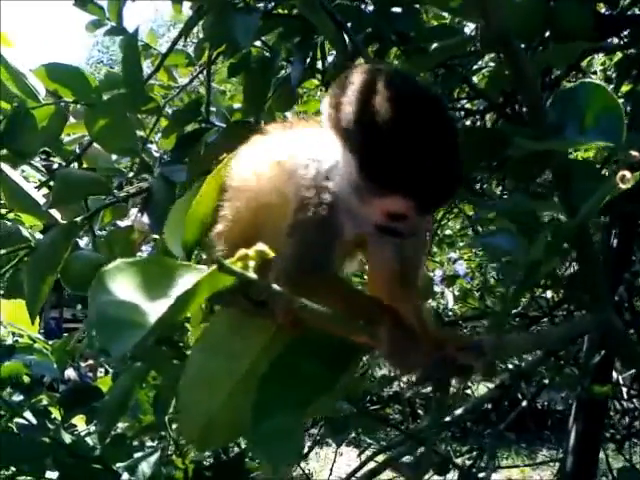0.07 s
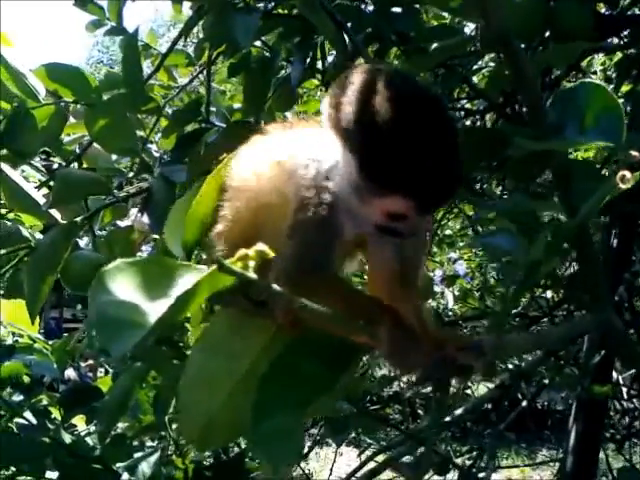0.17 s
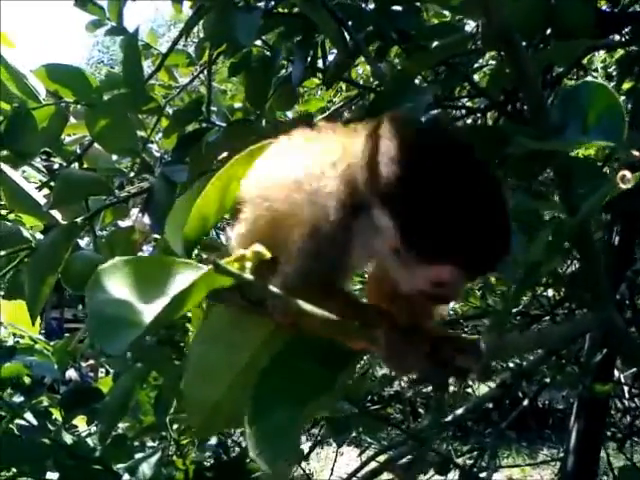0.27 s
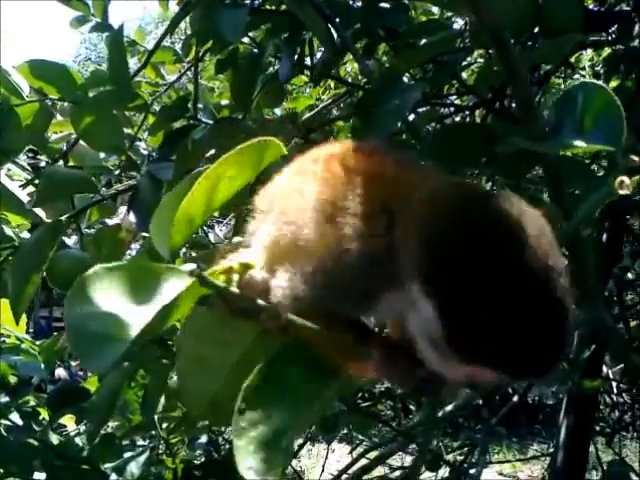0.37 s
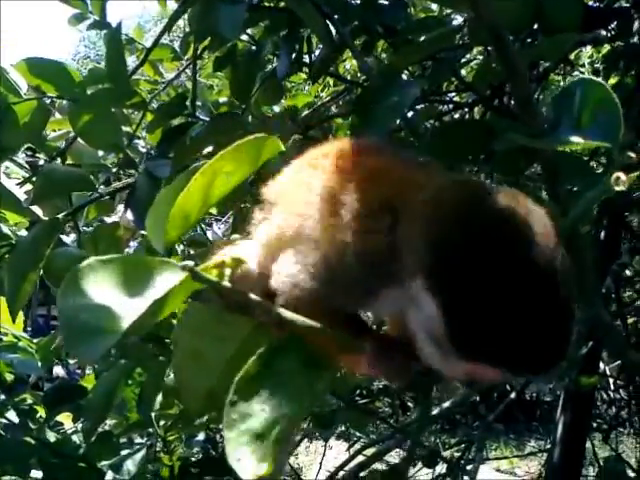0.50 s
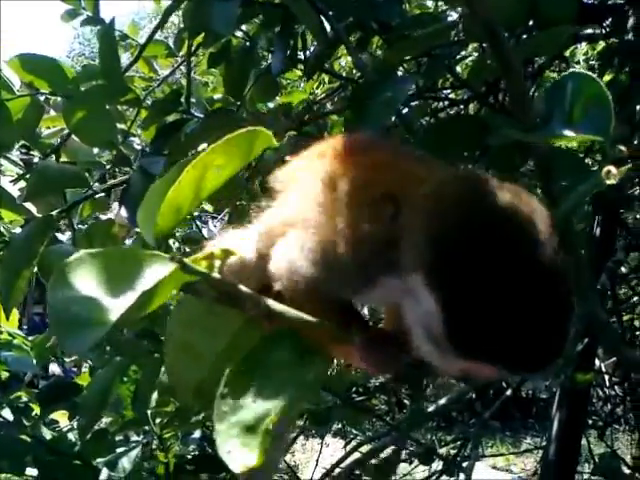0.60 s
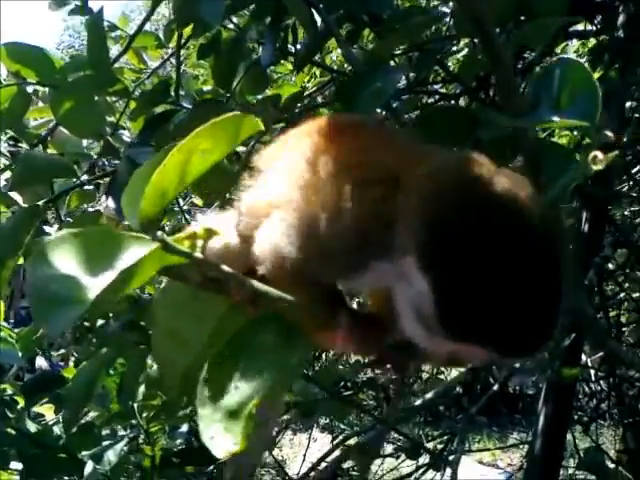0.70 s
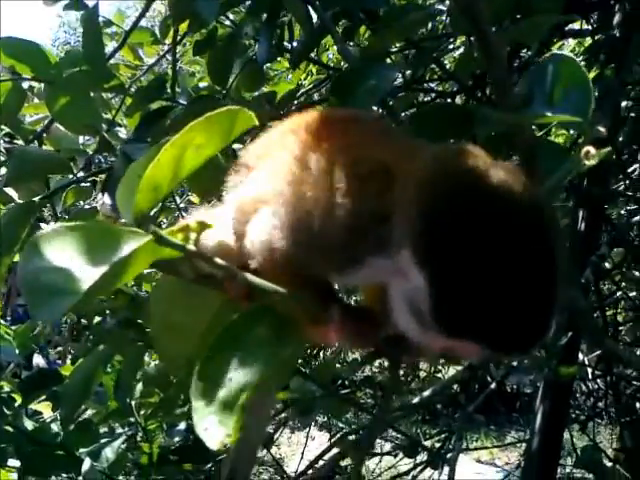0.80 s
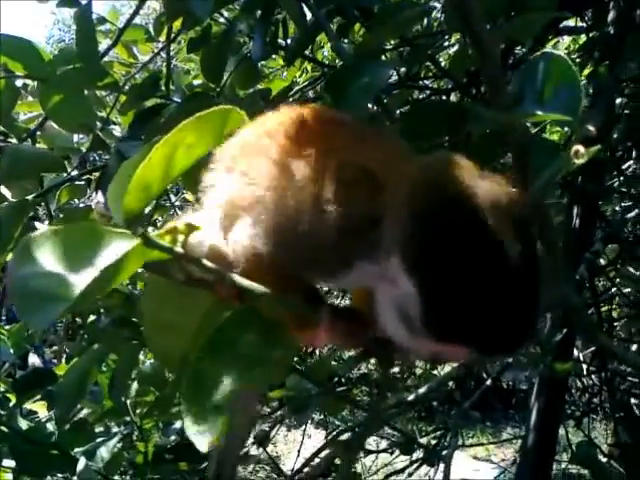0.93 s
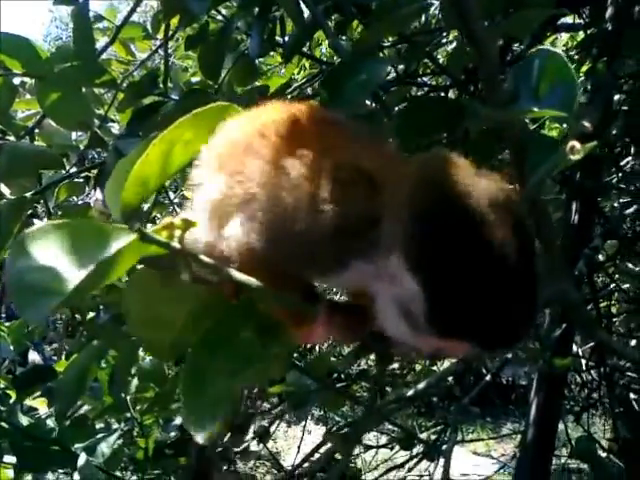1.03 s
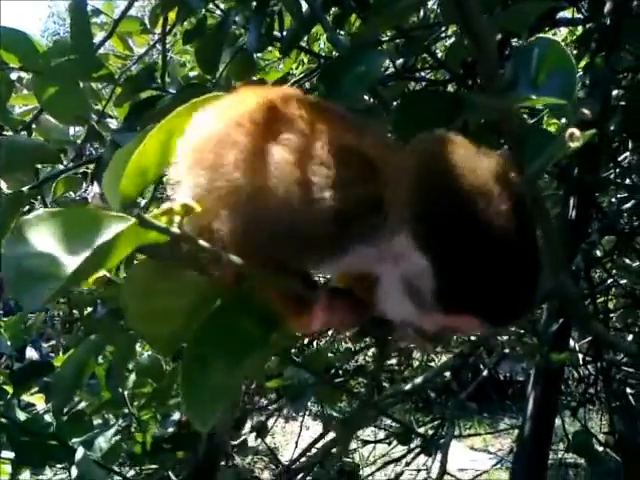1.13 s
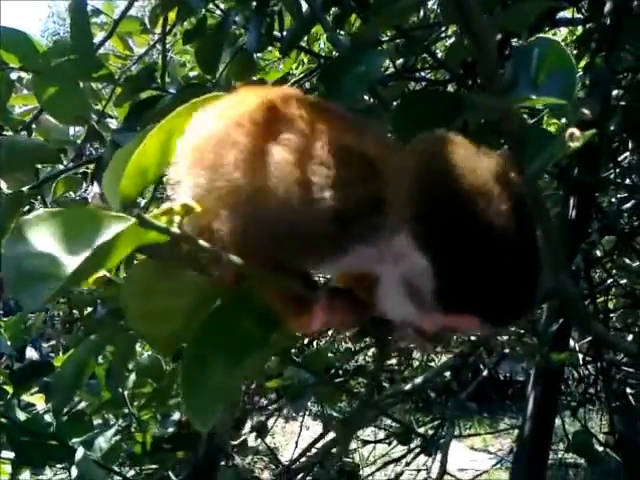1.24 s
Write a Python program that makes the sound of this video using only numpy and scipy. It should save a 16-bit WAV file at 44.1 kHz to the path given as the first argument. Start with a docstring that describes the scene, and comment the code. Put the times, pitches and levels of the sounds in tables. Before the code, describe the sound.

A low, hollow wooden thump close to the microphone, preceded by a lighter bump and followed by soft dull knocks that fade out, over quiet steady hiss, low rumble and faint leaf rustle outdoors.

```python
"""A steady hiss and a low rumble that swells and fades, both noise shaped by half-octave bands. Over them
something hollow and wooden near the microphone is bumped, once hard and several times softly: resonators
ring low and bands of noise die away. Outdoors under trees, leaves rustle in short brushes of dense crackle,
an insect trills thinly (a narrow band of noise), and a few faint chirps (gliding sines) sound far off."""
import sys
import numpy as np
from scipy import signal
from scipy.io import wavfile

SR = 44100
rng = np.random.default_rng(int(sys.argv[2]) if len(sys.argv) > 2 else 0)


def store_pcm(level_fs):
    """Save levels as 16-bit WAV."""
    pcm = np.round(np.clip(level_fs, -1, 1) * 32767).astype(np.int16)
    wavfile.write(sys.argv[1], SR, np.atleast_2d(pcm).T)


def invert_db(level):
    """Linear amplitude ratio for a level in decibels (20 dB per decade), elementwise."""
    return 10 ** (np.asarray(level, dtype=float) / 20)


N = 57330

# rumble spectrum: (frequency [Hz], relative density [dB])
RUMBLE_SPECTRUM = [(8.8, -36), (15, -8.5), (75, 4.5), (210, -2.5), (229, -5), (469, -9), (577, -23),
                   (900, -16), (1170, -32), (1980, -120)]
# rumble swelling and fading: (time [s], level [dB])
RUMBLE_LEVEL = [(0, -66), (0.098, -63.5), (0.201, -65), (.5, -62.5), (.9, -68), (1.051, -71.5),
                (1.2, -70.5), (1.3, -77)]
# hiss spectrum: (frequency [Hz], relative density [dB])
HISS_SPECTRUM = [(350, -58), (600, -6), (1170, -13), (1960, -7.5), (2990, -9.5), (5000, -11.5),
                 (7000, -14.5), (9000, -15.5), (12000, -19.5), (17000, -18)]
# faint chirps: (start [s], length [s], level [dB], start pitch [Hz], end pitch [Hz])
CHIRP_GLIDES = [(0.132, 0.061, -72, 2550, 2650), (0.163, 0.017, -70, 2500, 2520),
                (0.19, 0.023, -71, 2480, 2430), (1.16, 0.045, -72.5, 9000, 8550),
                (1.199, 0.036, -71.5, 7950, 8340)]
# brushes of leaves: (start [s], level [dB], rise [s], t60 [s], centre [Hz], width [octaves])
LEAF_BRUSHES = [(-.03, -69, .02, 0.28, 9400, 0.73), (.04, -64.5, 0.047, 0.55, 1100, 0.79),
                (0.088, -54, 0.011, 0.13, 455, 0.42), (.163, -64, 0.0025, 0.29, 6300, 0.77),
                (.25, -69.5, 0.025, 0.56, 3250, 1.1), (.64, -71, 0.015, 0.52, 4080, 2),
                (.8, -69.5, 0.089, 1, 3060, 1.55), (0.899, -68, 0.0016, 0.2, 2730, 0.37),
                (.975, -63.5, 0.034, 0.67, 4880, 1.83), (1.071, -62.5, 0.048, 0.48, 4850, 1.5),
                (1.101, -69.5, 0.015, 0.46, 1480, .8), (1.161, -70.5, 0.0075, 0.19, 5450, 1.8),
                (1.19, -78, 0.014, 0.34, 8400, 0.58), (1.28, -69, 0.0048, 0.14, 3880, 0.92)]
# bumps: (time [s], strength [dB], hardness as top of contact [Hz], extra drive of the deep boom [dB])
WOOD_BUMPS = [(0.031, -63.5, 108, 11), (0.196, -37.5, 378, 2), (0.244, -61, 410, 3), (.318, -47, 307, 8),
              (0.3623, -29, 1280, 3), (.372, -38.5, 1410, -0.5), (0.388, -47.5, 1460, -1),
              (0.412, -54.5, 1440, 0), (0.429, -54.5, 285, 9), (0.498, -61, 300, 11), (0.543, -41, 101, 1),
              (.62, -43, 308, 4.5), (0.641, -47.5, 484, -2), (0.698, -54.5, 205, 13.5), (0.739, -51, 88, 2),
              (.838, -44, 390, -2), (0.854, -59, 600, 8), (0.888, -54.5, 132, 11), (1.101, -61, 199, -5.5),
              (1.168, -57, 100, -9.5)]
# ringing modes of the wood: (frequency [Hz], relative level [dB], t60 [s])
WOOD_MODES = [(52.3, -9, 0.53), (72.43, 0, 0.43), (119.5, 8.5, 0.14), (172, -5, 0.071), (212, 4, 0.13),
              (238.5, 1, 0.17), (308.4, -9.5, 0.14), (395.2, -3.5, .23), (471.7, -14.5, 0.19),
              (628, -28, 0.34), (912, -8, 0.044), (1094, -7.5, 0.083), (1380, -52, .07),
              (1690, -13.5, 0.07), (1900, 3, 0.017), (2510, -15, 0.046)]
# shudder after each bump, by octave band: (centre [Hz], level re bump [dB], t60 [s])
SHUDDER_BANDS = [(29.2, -20.5, 1.2), (60.5, -20.5, 0.72), (136, -21, 0.47), (265, -13, 0.39),
                 (590, -31, 0.52), (1100, -14, 0.15), (2110, -25, 0.27)]

HISS_DB = -70.5
INSECT_HZ, INSECT_HALF_WIDTH_HZ, INSECT_DB = 7186, 70, -81
INSECT_THROB_DB, INSECT_THROB_CORNER_HZ = 3.5, 30
CHIRP_WOBBLE_FRACTION, CHIRP_WOBBLE_CORNER_HZ = 0.02, 400
CRACKLES_PER_S, CRACKLE_SPREAD_DB = 3300, 1
BOOM_BELOW_HZ = 90
SHUDDER_RISE_S = 0.0025
CHATTER_PER_S, CHATTER_T60_S, CHATTER_DB, CHATTER_ABOVE_HZ = 1000, 0.09, -9, 410
MIC_CUT_HZ = 34.7


def rms_one(x):
    """Scales to rms 1."""
    return x / np.sqrt(np.mean(x ** 2) + 1e-20)


def drift(corner_hz):
    """Random drift of rms 1: white noise through a double one-pole low-pass, run in for 1 s."""
    r = np.exp(-2 * np.pi * corner_hz / SR)
    noise = rng.standard_normal(N + SR)
    return rms_one(signal.lfilter([1], [1, -2 * r, r * r], noise)[SR:])


def band(x, low_hz, high_hz):
    """Butterworth band-pass."""
    sos = signal.butter(2, [low_hz, min(high_hz, 0.45 * SR)], "band", fs=SR, output="sos")
    return signal.sosfilt(sos, x)


def ring(x, hz, t60_s):
    """Two-pole resonator: a unit click starts a decaying sine of initial height 1."""
    r = invert_db(-60 / (t60_s * SR))
    w = 2 * np.pi * hz / SR
    return signal.lfilter([0, np.sin(w)], [1, -2 * r * np.cos(w), r * r], x + 1e-18)


def swell(start_s, rise_s, t60_s):
    """Envelope: exponential rise from the start times exponential decay."""
    t = np.maximum(np.arange(N) / SR - start_s, 0)
    return (1 - np.exp(-t / max(rise_s, 1e-4))) * invert_db(-60 * t / t60_s)


def soften(x, corner_hz):
    """Double one-pole low-pass: a lower corner makes a softer contact."""
    r = np.exp(-2 * np.pi * corner_hz / SR)
    return signal.lfilter([(1 - r) ** 2], [1, -2 * r, r * r], x + 1e-18)


def coloured_noise(spectrum, flicker_db, flicker_corner_hz):
    """Half-octave noise bands, flickering partly together and partly alone; rms 1."""
    hz, db = np.transpose(spectrum)
    edges_hz = hz[0] * 2 ** np.arange(0, np.log2(hz[-1] / hz[0]) + 0.5, 0.5)
    white = rng.standard_normal((2, N + SR))  # neighbouring bands use different noise
    together = drift(flicker_corner_hz)
    out = 0
    for k, (low, high) in enumerate(zip(edges_hz, edges_hz[1:])):
        level_db = np.interp(np.log(low * high) / 2, np.log(hz), db)
        flicker = flicker_db * (together + drift(flicker_corner_hz))
        out = out + invert_db(level_db + flicker) * band(white[k % 2], low, high)[SR:]
    return rms_one(out)


def hiss():
    """Coloured noise at a steady level."""
    return invert_db(HISS_DB) * coloured_noise(HISS_SPECTRUM, flicker_db=1.13, flicker_corner_hz=5.4)


def rumble():
    """Low coloured noise under a level curve."""
    level_db = np.interp(np.arange(N) / SR, *np.transpose(RUMBLE_LEVEL))
    return invert_db(level_db) * coloured_noise(RUMBLE_SPECTRUM, flicker_db=0.9, flicker_corner_hz=5)


def insect():
    """A narrow band of noise, throbbing irregularly."""
    noise = rng.standard_normal(N)
    line = rms_one(band(noise, INSECT_HZ - INSECT_HALF_WIDTH_HZ, INSECT_HZ + INSECT_HALF_WIDTH_HZ))
    return invert_db(INSECT_DB + INSECT_THROB_DB * drift(INSECT_THROB_CORNER_HZ)) * line


def chirps():
    """Short gliding sines with an unsteady pitch."""
    out = np.zeros(N)
    wobble = 1 + CHIRP_WOBBLE_FRACTION * drift(CHIRP_WOBBLE_CORNER_HZ)
    for start_s, length_s, db, start_hz, end_hz in CHIRP_GLIDES:
        part = np.clip((np.arange(N) / SR - start_s) / length_s, 0, 1)
        pitch_hz = (start_hz + (end_hz - start_hz) * part) * wobble
        phase = 2 * np.pi * np.cumsum(pitch_hz) / SR
        out += invert_db(db) * np.sqrt(2 * np.sin(np.pi * part)) * np.sin(phase)
    return out


def leaves():
    """Random clicks form a dense crackle; each brush is a band of it, swelling and dying."""
    sizes = invert_db(CRACKLE_SPREAD_DB * np.minimum(rng.exponential(1, N), 5)) * rng.choice([-1, 1], N)
    crackle = sizes * (rng.random(N) < CRACKLES_PER_S / SR)
    out = np.zeros(N)
    for start_s, db, rise_s, t60_s, hz, octaves in LEAF_BRUSHES:
        half = 2 ** (octaves / 2)
        out += invert_db(db) * swell(start_s, rise_s, t60_s) * rms_one(band(crackle, hz / half, hz * half))
    return out


def bumped_wood():
    """Soft pushes with chattering light touches excite the modes; band noise shudders after each."""
    force, boom_force, out = np.zeros(N), np.zeros(N), np.zeros(N)
    chatter = (rng.random(N) < CHATTER_PER_S / SR) * rng.standard_normal(N)
    noises = []
    for hz, _, _ in SHUDDER_BANDS:
        noise = rng.standard_normal(N + SR)
        noises.append(rms_one(band(noise, hz / np.sqrt(2), hz * np.sqrt(2))[SR:]))
    for time_s, db, top_hz, boom_db in WOOD_BUMPS:
        touch = invert_db(CHATTER_DB) * chatter * swell(time_s, 0, CHATTER_T60_S)
        touch = touch - soften(touch, CHATTER_ABOVE_HZ)  # drop the low chatter
        touch[int(time_s * SR)] -= 1  # the bump itself
        push = invert_db(db - 7) * soften(soften(touch, top_hz), 2 * top_hz)
        force += push
        boom_force += invert_db(boom_db) * push
        for noise, (hz, level_db, t60_s) in zip(noises, SHUDDER_BANDS):
            softness = 1 / (1 + (hz / top_hz) ** 2)  # soft bumps shake the high bands less
            out += invert_db(db + level_db) * softness * noise * swell(time_s, SHUDDER_RISE_S, t60_s)
    for k, (hz, db, t60_s) in enumerate(WOOD_MODES):
        drive = boom_force if hz < BOOM_BELOW_HZ else force
        out += (-1) ** k * invert_db(db) * ring(drive, hz, t60_s)  # alternating polarity
    return out


def scene():
    """Sums all sources into one channel."""
    background = hiss() + rumble()
    mix = background + bumped_wood() + leaves() + chirps() + insect()
    return mix[None, :]


def band_limit(x):
    """A steep low-pass at the top of the band."""
    return signal.sosfilt(signal.butter(12, 15620, fs=SR, output="sos"), x)


def record(dry):
    """The microphone loses the deepest bass: one-pole high-pass."""
    r = np.exp(-2 * np.pi * MIC_CUT_HZ / SR)
    mix = signal.lfilter([1, -1], [1, -r], dry)
    return band_limit(mix)


dry = scene()
out = record(dry)
store_pcm(out)
```